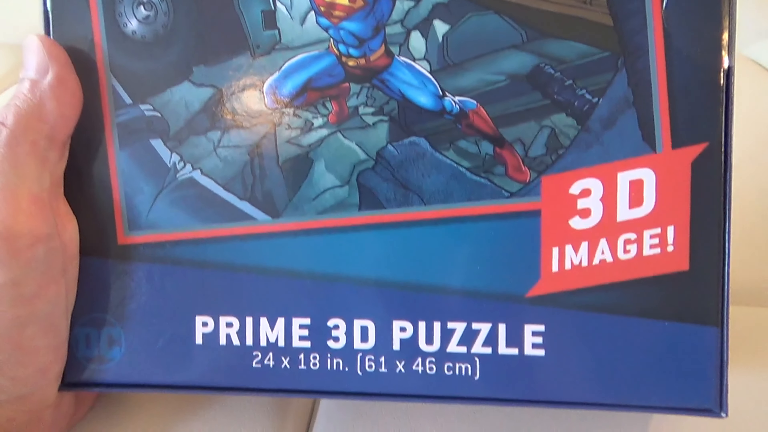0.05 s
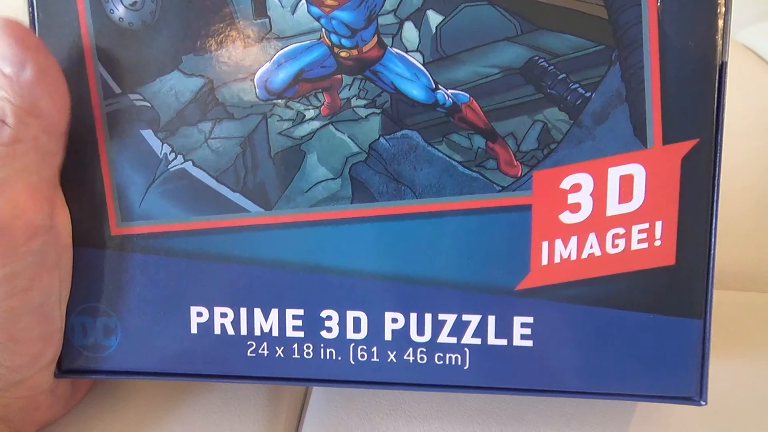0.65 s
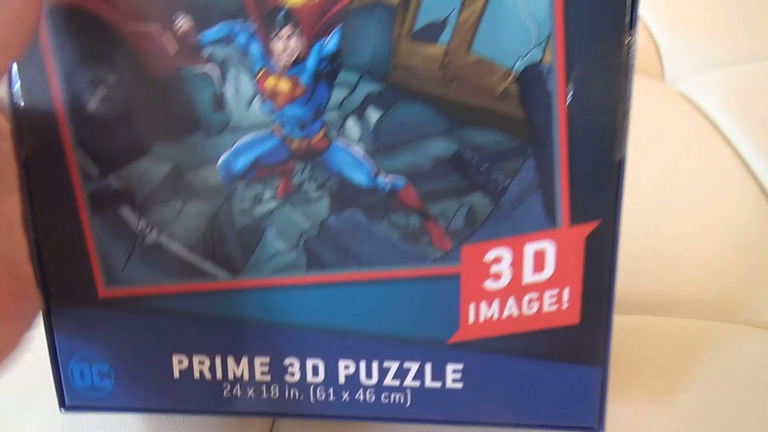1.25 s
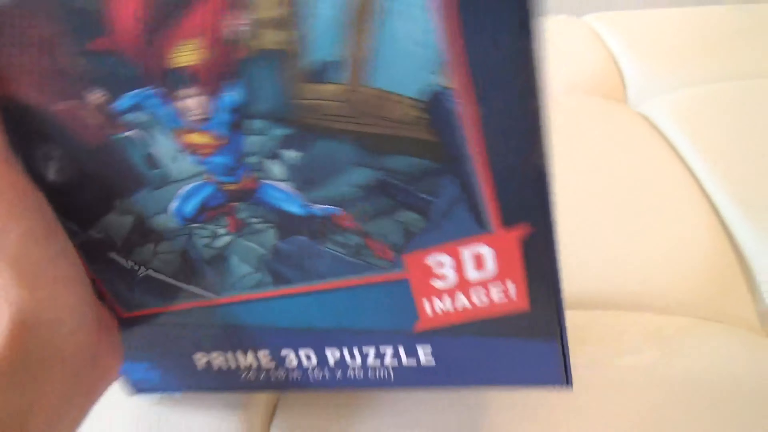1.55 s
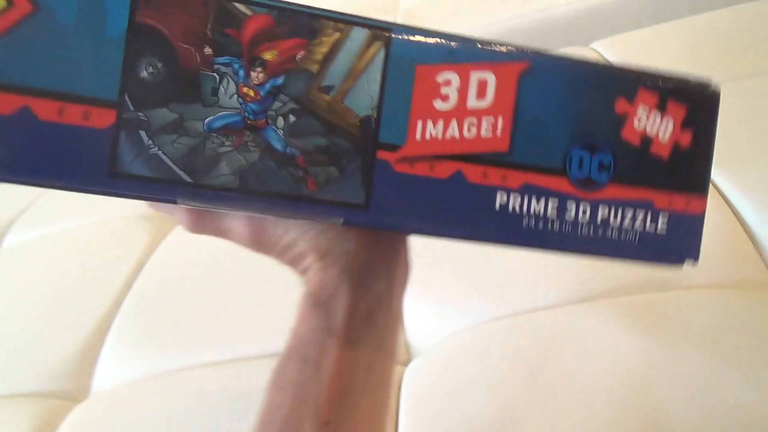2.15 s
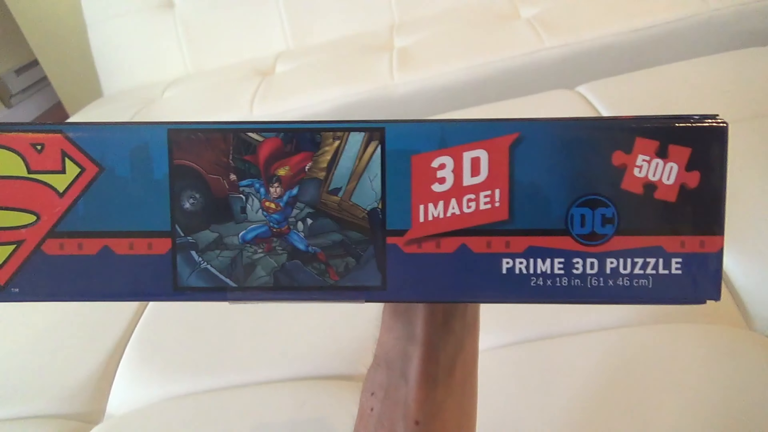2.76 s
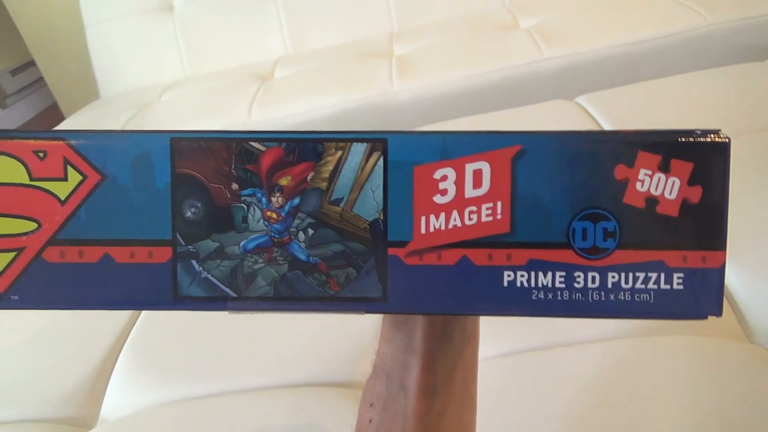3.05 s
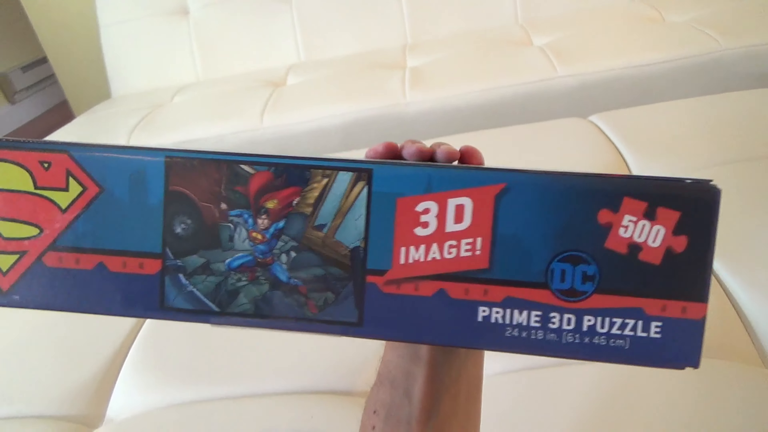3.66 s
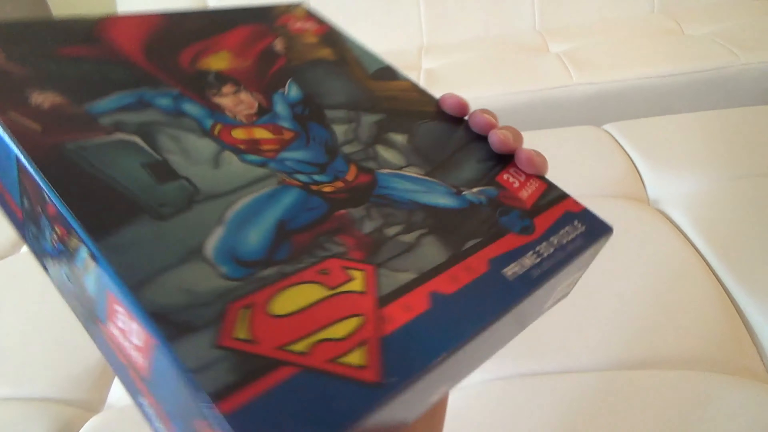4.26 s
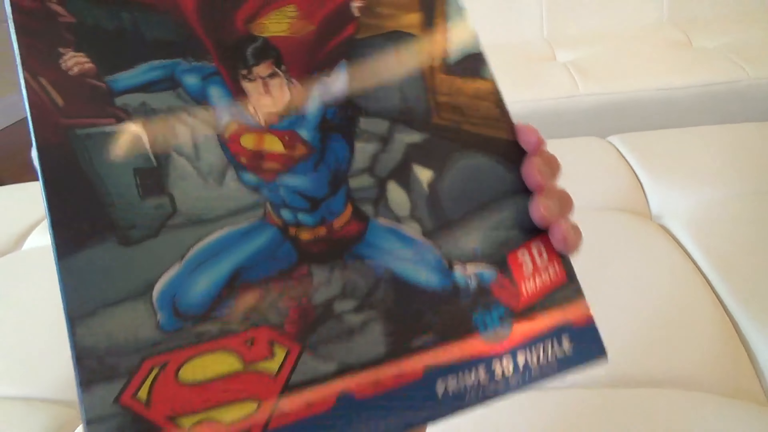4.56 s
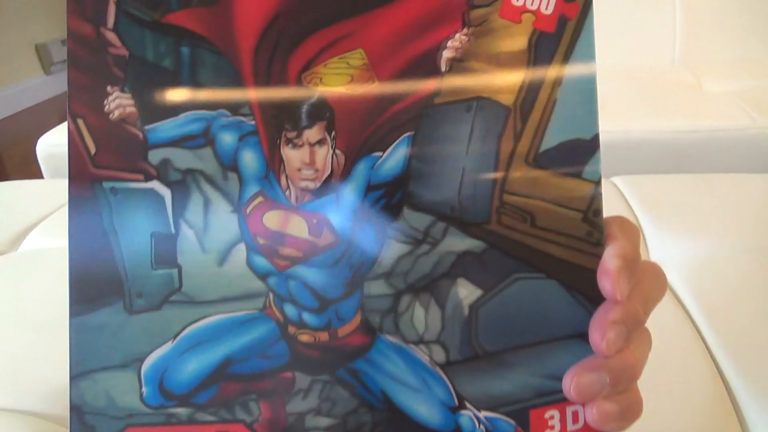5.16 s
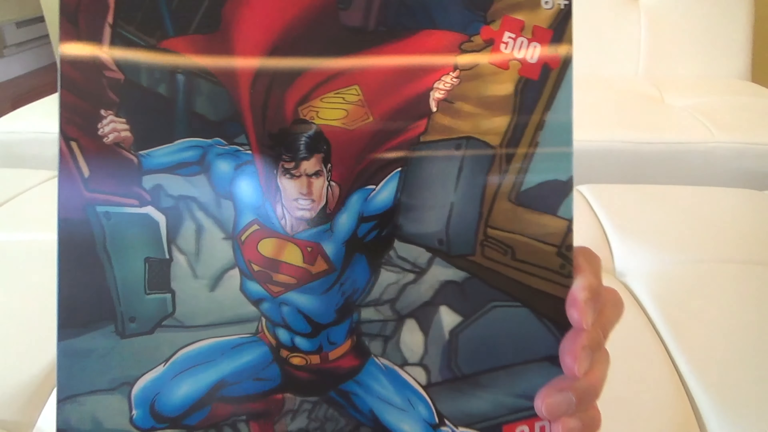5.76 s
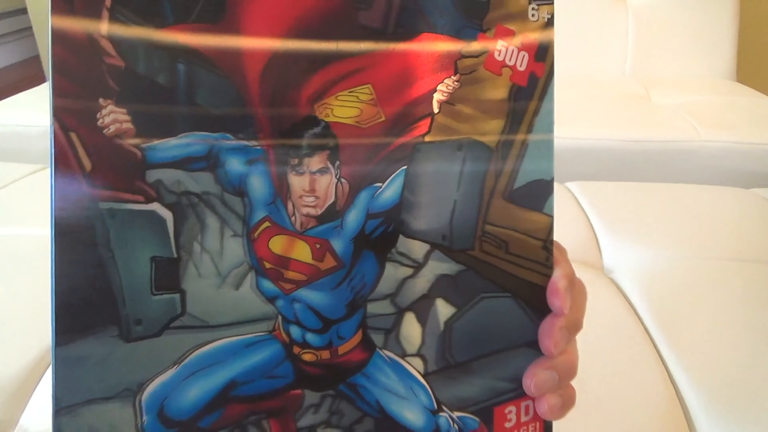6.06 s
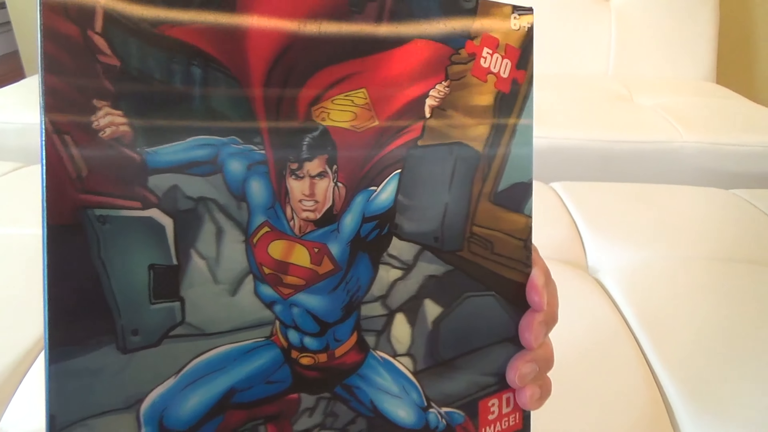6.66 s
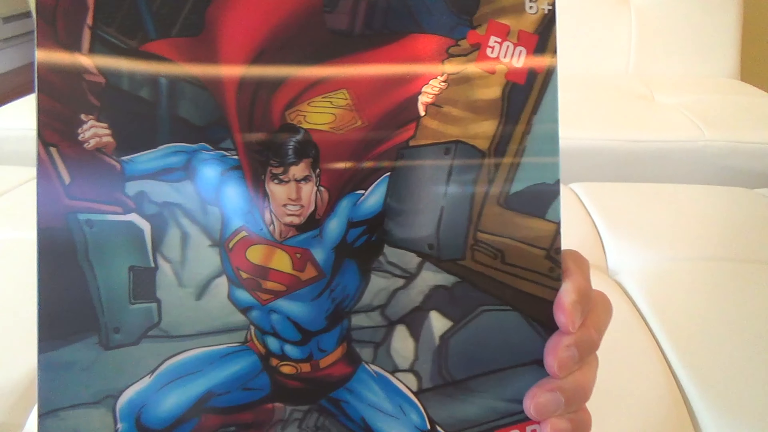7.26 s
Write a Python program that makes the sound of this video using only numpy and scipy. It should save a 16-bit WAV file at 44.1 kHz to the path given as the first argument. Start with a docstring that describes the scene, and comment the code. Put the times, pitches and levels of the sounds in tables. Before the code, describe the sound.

A cardboard puzzle box is turned in the hand, loose pieces sliding, rattling and knocking inside, in a quiet room.

```python
"""A low hum fills a quiet furnished room, and a phone camera's focus drive ticks faintly once a frame.
Then, close by, a cardboard jigsaw box is tipped over and turned upright again. Fingers scuff the glossy
lid by stick-slip friction, and the loose pieces slide in a heap, a dense train of small impacts.
Single pieces knock on the walls and bend them; the box and the air in it ring at their resonances."""
import sys
import numpy as np
from scipy import signal
from scipy.fft import rfft, irfft
from scipy.io import wavfile
from scipy.ndimage import uniform_filter1d

SR = 44100
rng = np.random.default_rng(int(sys.argv[2]) if len(sys.argv) > 2 else 0)


def log_audio(samples):
    """Write samples as a 16-bit WAV file to the path given in sys.argv[1]."""
    # one column per channel
    frames = np.atleast_2d(samples).T
    # limit to full scale, then quantise
    limited = np.clip(frames, -1, 1)
    pcm = np.round(limited * 32767).astype(np.int16)
    wavfile.write(sys.argv[1], SR, pcm)


N = 322371
T = np.arange(N) / SR


def undb(db):
    """Decibels to amplitude ratio."""
    return 10 ** (np.asarray(db) / 20)


def level(x, db):
    """Set the rms level."""
    return x * undb(db) / np.sqrt(np.mean(x ** 2))


def burst(x, db):
    """Equal energy: scale a transient to match 10 ms of steady sound at this level."""
    return x * undb(db) * np.sqrt(SR / 100 / np.sum(x ** 2))


def over_time(points):
    """Linear interpolation of (time_s, value) points at every sample."""
    return np.interp(T, *np.transpose(points))


def at_pitch(points, hz):
    """Interpolation of (frequency_hz, value) points on a log-frequency axis."""
    f, value = np.transpose(points)
    return np.interp(np.log(np.maximum(hz, 1)), np.log(f), value)


def colour(x, points):
    """Spectral shaping by (frequency_hz, gain_db) points."""
    bins_hz = np.arange(N // 2 + 1) * SR / N
    return irfft(rfft(x) * undb(at_pitch(points, bins_hz)), N)


def ring(x, hz, width_hz):
    """A damped resonator with unit gain at its centre."""
    quality = hz / min(width_hz, SR / 4)
    return signal.lfilter(*signal.iirpeak(min(hz, SR / 2 - 1), quality, fs=SR), x)


def band(x, lo, hi):
    """Steep band-pass filter."""
    return signal.sosfilt(signal.butter(3, [lo, min(hi, SR / 2 - 1)], "band", fs=SR, output="sos"), x)


def add(out, start_s, x):
    """Superposition: mix x in at start_s."""
    i = int(start_s * SR)
    out[i:i + len(x)] += x[:N - i]


def wander(per_s):
    """Random modulation: values held briefly and smoothed, with a spread near 1."""
    hold = int(SR / per_s)
    return 1.52 * uniform_filter1d(rng.standard_normal(N)[np.arange(N) // hold], hold)


# spectrum of the room's still air: frequency_hz, relative_db
AIR_SPECTRUM = [(25, -22), (45, -9.5), (80, -5.5), (130, -5), (210, -3.5), (380, -6.5), (600, -9),
                (1000, -12.5), (1600, -20.5), (2600, -21.5), (5000, -24), (11000, -28)]
def room_air(noise_db=-58.5, hum_hz=58.5, hum_db=-68.5):
    """Ambient noise, partly correlated between the channels, over a pure tone of mains hum."""
    mid, side = (colour(rng.standard_normal(N), AIR_SPECTRUM) for _ in range(2))
    opposed = np.array([[1], [-1]])
    noise = level(mid, noise_db) + level(side, noise_db - 9.5) * opposed
    noise = noise + 0.19 * band(noise, 116, 1050) * opposed  # the rumble is stronger on the left
    return noise + level(np.sin(2 * np.pi * hum_hz * T), hum_db)


# pulls of the focus drive: start_s, pitch_hz, sag_hz_per_s, relative_db
LENS_PULLS = [(0, 3023, 59, -57), (.37, 2965, 30, -56), (1.2, 3030, 70, -55.5), (2.9, 2784, 10, -58.5),
              (4.2, 2780, 246, -60.5), (4.9, 3020, 220, -57.5), (6.77, 3028, 78, -57)]
def lens_motion(ease_db=9.5, ease_s=0.44):
    """Relaxation: each pull starts hard and eases off, while its pitch sags as the lens travels."""
    hz, db = np.zeros(N), np.zeros(N)
    for start_s, pitch_hz, sag_hz_per_s, start_db in LENS_PULLS:
        now = T >= start_s
        age = T[now] - start_s
        hz[now] = pitch_hz - sag_hz_per_s * age
        db[now] = start_db - ease_db * (1 - np.exp(-age / ease_s))
    return hz, db


# how early in its frame the lens is nudged: time_s, lead_s
NUDGE_LEAD = [(.7, .008), (3, 0)]
def focus_drive(frame_hz=30, offset_s=.0165, swell_s=0.0037, tick_hz=3020, tick_db=-74):
    """Periodic excitation: once a frame the lens is nudged, giving a resonant tick and a short whistle."""
    hz, db = lens_motion()
    frame, phase = np.divmod((T + over_time(NUDGE_LEAD) - offset_s) * frame_hz + .5, 1)
    since_s = (phase - .5) / frame_hz
    uneven_db = 2.6 * rng.standard_normal(int(frame[-1]) + 2)[frame.astype(int)]
    swell = np.exp(-((since_s - .003) / swell_s) ** 2 / 2)
    whistle = swell * np.sin(2 * np.pi * np.cumsum(hz) / SR)
    nudges = rng.standard_normal(N) * np.exp(-(since_s / 0.0016) ** 2)
    tick = ring(nudges, tick_hz, width_hz=190)
    return undb(db + uneven_db + 2.5) * whistle + level(tick, tick_db)


# time the room takes to decay by 60 dB: frequency_hz, decay_s
ROOM_DECAY = [(150, 2), (400, 1.42), (1000, 0.45), (2800, 1.2), (8000, 0.37)]
# strength of the reflected sound: frequency_hz, gain_db
ROOM_GAIN = [(150, -13.5), (400, -11), (1000, -13.5), (2800, -22.5), (8000, -11.5)]
def reverberation(x, bass_spread=0.15, treble_spread=1.3):
    """Diffuse reflections from walls and furniture decay exponentially, widest in the treble."""
    t, tail = T[:SR * 2 // 3], 0
    onset = np.clip((t - .003) / .005, 0, 1)
    for hz in 125 * 2 ** np.arange(7):
        fade = undb(-60 * t / at_pitch(ROOM_DECAY, hz)) * onset
        mid, side = band(rng.standard_normal((2, len(t))), hz / np.sqrt(2), hz * np.sqrt(2))
        side = side * np.interp(hz, [1000, 4000], [bass_spread, treble_spread])
        gain = undb(at_pitch(ROOM_GAIN, hz)) / np.linalg.norm(fade)
        tail = tail + (mid + np.array([side, -side])) * gain * fade
    return signal.fftconvolve(x[None], tail, axes=1)[:, :N]


# hand and card edges on the lid, deep where the palm presses: start_s, length_s, level_db, centre_hz
LID_SCUFFS = [(0.604, 0.0068, -54, 3000), (0.63, 0.0038, -56, 7400), (0.899, 0.01, -42, 5400),
              (.911, 0.023, -35, 134), (1.187, 0.0032, -50.5, 9500), (1.3, 0.062, -35.5, 160),
              (1.499, 0.011, -34, 1430), (1.767, 0.0032, -31.5, 6900), (1.793, .0043, -38, 6200),
              (2.004, 0.011, -37.5, 5000), (2.07, 0.0048, -56, 6970), (2.182, 0.0029, -54, 6010),
              (2.442, 0.0054, -48.5, 3560), (2.847, .03, -48, 3200), (4.126, 0.068, -54, 9500),
              (4.192, 0.05, -47, 1330), (6.023, 0.046, -47.5, 1390)]
def scuffs(relative_width=0.56):
    """Stick-slip friction on glossy card gives brief bursts of uneven, band-limited noise."""
    out, t = np.zeros(N), T[:SR // 12]
    for start_s, length_s, db, hz in LID_SCUFFS:
        pressure = np.exp(-(2 * t / length_s - 1) ** 4)
        slips = rng.standard_normal(len(t)) * rng.exponential(size=len(t)) * pressure
        width_hz = relative_width * hz
        add(out, start_s, burst(ring(ring(slips, hz, width_hz), hz, width_hz), db))
    return out


# resonances of the box and the air in it: frequency_hz, width_hz, gain_db
BOX_MODES = [(156, 34, -4.5), (212.4, 9, -6.5), (298.4, 44, 1.5), (360.7, 6.5, -1), (403.6, 8.1, 2.5),
             (477.7, 16.6, 1.5), (697, 7.2, -5.5), (807, 42, -1), (894, 5.3, -14), (955, 20, -8),
             (1034, 43, 0), (1310, 180, -12.5), (1488, 110, -6), (1580, 124, -1), (1770, 160, -6.5),
             (2510, 83, -10)]
def box(push):
    """Modal response: the walls pass a push on at once, and the resonances ring after it."""
    return push + sum(undb(db) * ring(push, hz, width_hz) for hz, width_hz, db in BOX_MODES)


# tilts that let the heap slide, with its weight on the floor: start_s, length_s, level_db, weight_db
TILTS = [(0.591, 0.043, -56.5, 3), (0.704, 0.039, -47.5, 0), (0.863, .15, -50, 4), (1.073, 0.18, -46, 2),
         (1.278, .15, -41.5, -1.5), (1.442, .14, -46.5, -8), (1.59, 0.087, -44, -1.5),
         (1.676, 0.098, -26, -10), (1.782, .08, -22.5, -19), (1.874, .15, -27, -13.5), (2.052, .1, -39, -7),
         (2.198, .1, -45.5, -5), (2.307, 0.26, -42.5, -2.5), (2.557, 0.072, -35.5, -6.5),
         (2.648, .07, -34.5, -4), (2.728, 0.082, -37, -6.5), (2.84, 0.082, -45.5, -5), (3, 0.42, -64.5, -5),
         (4.12, 0.17, -59, -5), (4.539, 0.16, -52, 1), (4.694, 0.17, -49.5, -4), (4.823, 0.1, -49, -2),
         (5.04, .13, -54.5, -1.5), (5.353, 0.038, -55, -1), (5.506, 0.037, -58.5, 1.5),
         (6.03, 0.097, -55, -0.5), (6.207, 0.06, -56.5, -1), (6.304, .15, -64, 7)]
def heap_motion(attack_s=0.0114, sag_db_per_s=11, release_db_per_s=243, resting_db=-71):
    """Incoherent powers add: the tilts sum to the heap's level and its relative bass weight, in dB."""
    power = bass_power = undb(resting_db) ** 2
    for start_s, length_s, db, weight_db in TILTS:
        # a slide gathers speed, slows as the heap runs out, then comes to rest
        age = np.maximum(T - start_s, 0)
        attack = np.minimum(age / attack_s, 1)
        fall_db = sag_db_per_s * age + release_db_per_s * np.maximum(age - length_s, 0)
        moving = (attack * undb(db - np.minimum(fall_db, 100))) ** 2
        power = power + moving
        bass_power = bass_power + moving * undb(weight_db) ** 2
    return 10 * np.log10(power), 10 * np.log10(bass_power / power)


def tumbles(heap_db, per_s=16, offset_db=-2.5, spread_db=1.5, centre_hz=700, spread_octaves=0.43):
    """Random impacts: pieces tumble off the heap with a force that follows its motion; rows as in BLOWS."""
    rows = []
    for start_s, length_s, _, _ in TILTS:
        fractions, chance = rng.random(size=8), rng.standard_normal(size=(8, 2))
        for fraction, (strength, pitch) in zip(fractions[:round(length_s * per_s)], chance):
            when_s = start_s + fraction * length_s
            db = np.interp(when_s, T, heap_db) + offset_db + spread_db * strength
            hz = centre_hz * 2 ** (spread_octaves * np.clip(pitch, -2, 2))
            thump_db, crack_db = db - 8, db - 19.5
            rows.append((when_s, db, hz, thump_db, crack_db))
    return rows


# spectrum of card rubbing on card: frequency_hz, relative_db
RUB_SPECTRUM = [(125, -22.5), (200, 1), (300, -2.5), (480, 7.5), (620, -2.5), (900, 5.5), (1600, -5),
                (2100, -7), (3000, -10.5), (4400, -22), (6200, -25.5), (8500, -24.5), (11000, -44.5)]
def slide(heap_db, weight_db, contacts_per_s=(260, 900), quality=3.45, patchy_db=6, jerk_db=1.5):
    """Shot noise: hundreds of small contacts, falling more densely the faster the heap moves."""
    db = heap_db + jerk_db * wander(per_s=45)  # the heap sticks and lets go
    rate = np.interp(db, [-55, -24], contacts_per_s)
    hits = np.flatnonzero(rng.random(N) < rate / SR)
    size = undb(np.minimum(rng.exponential(size=N), 4))[hits]
    grains = 0
    for hz in 140 * 2 ** (np.arange(20) / 3):
        chance = rng.standard_normal(N)
        push = np.zeros(N)
        # every contact favours a few bands, by where and how the piece lands
        push[hits] = size * np.sign(chance[hits - 1]) * undb(patchy_db * np.minimum(chance[hits], 2))
        friction = undb(np.interp(hz, [1500, 5000], [-11, 1])) * chance  # fills the gaps
        push = level(push, 0) + friction
        rattle = ring(ring(push, hz, hz / quality), hz, hz / quality)
        grains = grains + undb(at_pitch(RUB_SPECTRUM, hz)) * rattle
    grains = box(grains)
    # the pieces share one push, so a large contact starves those around it
    grains = grains / np.sqrt(uniform_filter1d(grains ** 2, SR // 30) + 1e-12)
    bass = signal.sosfiltfilt(signal.butter(3, 380, fs=SR, output="sos"), grains)
    return undb(db) * (level(grains - bass, -0.16) + undb(weight_db) * level(bass, -1.5))


# upper resonances of a stiff card edge: frequency_hz, width_hz, gain_db
EDGE_MODES = [(2350, 350, 13.5), (3440, 1000, 3.5), (5600, 1500, -8), (9400, 850, -12.5)]
def edge_crack(t, rise_s=0.00125):
    """Impulsive excitation: a brief crush rings the high modes of a card edge."""
    crush = rng.standard_normal(len(t)) * t * np.exp(-t / rise_s)
    return sum(undb(db) * ring(crush, hz, width_hz) for hz, width_hz, db in EDGE_MODES)


def panel_bend(t, hz, rise_cycles=0.52, sag=0.54, overtone_ratio=2.6):
    """Dispersion: short bending waves run faster in card, so the pitch sags as the knock dies."""
    age = t * hz / rise_cycles
    glide_hz = hz * (1 + sag * (np.exp(-age / 2) - .5))
    phase = 2 * np.pi * np.cumsum(glide_hz) / SR
    # a wide, slack panel rings with more of its second mode than a stiff wall
    overtone_db = np.interp(hz, [400, 1000], [-8, -19])
    return age * np.exp(-age) * (np.sin(phase) + undb(overtone_db) * np.sin(overtone_ratio * phase))


# the clearest blows of pieces and fingers, each level relative within its own column:
# start_s, level_db, pitch_hz, thump_db, crack_db
BLOWS = [(0.7333, -42.5, 564, -54, -63), (0.9099, -34, 725, -30, -40), (1.0478, -40, 630, -58, -56),
         (1.0963, -38.5, 576, -38, -54), (1.138, -27, 618, -58, -54.5), (1.1662, -38, 485, -42, -60),
         (1.3252, -33, 710, -30.5, -47), (1.372, -27.5, 790, -57, -47), (1.413, -35.5, 620, -46, -50),
         (1.4547, -30.5, 1240, -48, -54), (1.516, -34.5, 774, -50, -67), (1.5419, -34.5, 1340, -61, -74),
         (1.6849, -25, 575, -21.5, -35), (1.6917, -24, 820, -31, -40), (1.6968, -24.5, 670, -44, -40),
         (1.7185, -20, 408, -41, -31), (1.7352, -23.5, 1410, -34, -31), (1.75, -24, 800, -33, -48),
         (1.7677, -27, 810, -41, -37), (1.802, -26.5, 1030, -32, -35), (1.8241, -21.5, 377, -23, -33),
         (1.8398, -26, 1020, -28, -34), (1.8516, -25, 830, -36, -42), (1.9217, -30.5, 678, -20.5, -41),
         (1.9655, -26.5, 868, -40, -33), (2.0822, -33.5, 414, -39, -47), (2.1167, -29, 485, -28.5, -64),
         (2.1508, -34.5, 500, -40, -54), (2.2048, -34.5, 506, -44, -48.5), (2.3156, -32, 460, -38, -50.5),
         (2.4448, -32.5, 784, -59, -57), (2.48, -36, 590, -43, -67), (2.5895, -27, 700, -22, -44),
         (2.6145, -26.5, 1030, -47, -41.5), (2.6213, -27, 529, -21.5, -44), (2.672, -33.5, 653, -35, -64),
         (2.7152, -31, 1140, -48, -46), (2.7893, -31, 802, -31.5, -44.5), (2.8205, -32, 994, -50, -46),
         (2.8825, -28.5, 1340, -39, -46.5), (4.2483, -46.5, 1330, -69.5, -59.5),
         (4.8604, -43, 739, -60, -54), (4.8899, -23.5, 916, -38.5, -42.5), (4.9365, -42.5, 874, -63, -70),
         (5.1303, -36, 390, -44, -60), (6.242, -48.5, 1150, -59, -75), (6.8871, -41, 443, -40, -66)]
def knocks(stray_blows, chatter_db=-11, chatter_s=0.0056, thump_hz=260, thump_s=0.0043):
    """Impact: each blow bends a panel, jostles nearby pieces, thumps the box and cracks at the edge."""
    out, t = np.zeros(N), T[:SR // 6]
    for start_s, db, hz, thump_db, crack_db in BLOWS + stray_blows:
        jostle, shove = rng.standard_normal((2, len(t)))
        chatter = band(jostle * np.exp(-t / chatter_s), .5 * hz, 2.39 * hz)
        body = box(burst(panel_bend(t, hz), 0) + burst(chatter, chatter_db))
        thump = box(band(shove * np.exp(-t / thump_s), 0.73 * thump_hz, 1.39 * thump_hz))
        knock = burst(body, db + 0.056) + burst(thump, thump_db - 5.5) + burst(edge_crack(t), crack_db)
        add(out, start_s, knock)
    return out


# where the box is held, as the level difference of its lower frequencies: time_s, left_minus_right_db
BOX_BALANCE = [(0, 2.5), (1.2, 5), (1.75, 7.5), (2.8, 6), (4.2, 3.5), (7.3, 5)]
def scene():
    """A level difference between the channels places the box to the left, its body more than its treble."""
    background = focus_drive() + room_air()
    heap_db, weight_db = heap_motion()
    direct = slide(heap_db, weight_db) + scuffs() + knocks(tumbles(heap_db))
    heard = direct + reverberation(direct)
    side_db = over_time(BOX_BALANCE) * np.array([[.5], [-.5]])
    body = signal.sosfiltfilt(signal.butter(1, 2800, fs=SR, output="sos"), heard)
    treble = heard - body
    return background + body * undb(side_db - 0.98) + treble * undb(0.22 * side_db)


def record(dry, cutoff_hz=11150):
    """Band limiting: the phone cuts the top of the treble with a steep low-pass filter."""
    return signal.sosfilt(signal.ellip(10, .2, 80, cutoff_hz, fs=SR, output="sos"), dry)


dry = scene()
out = record(dry)
log_audio(out)
```